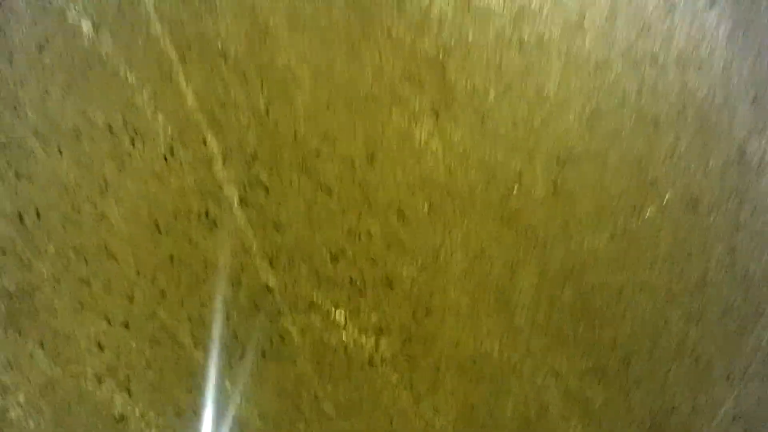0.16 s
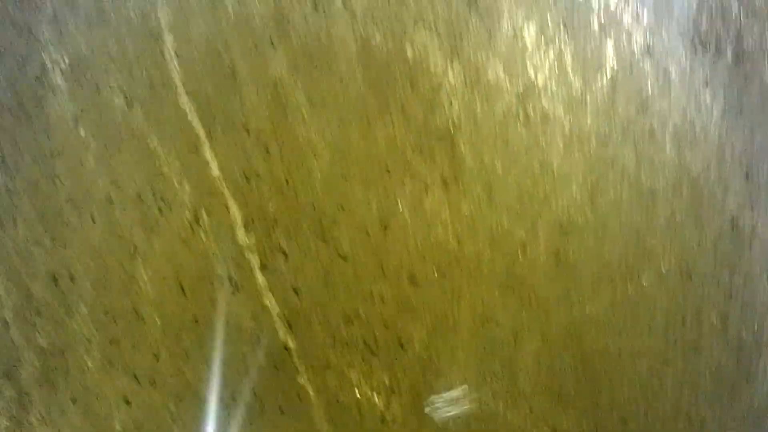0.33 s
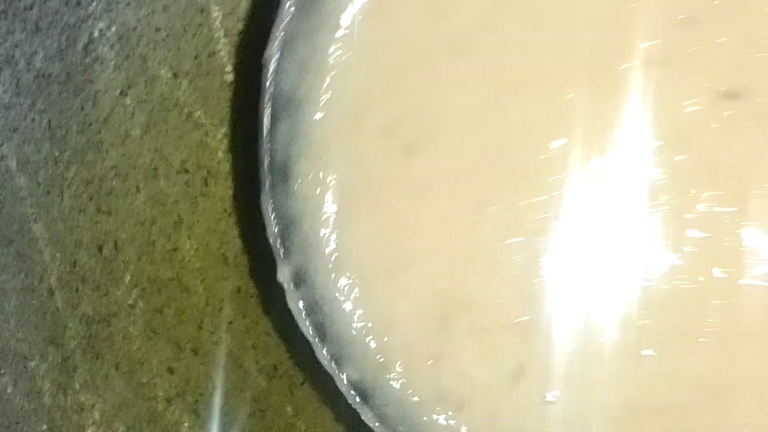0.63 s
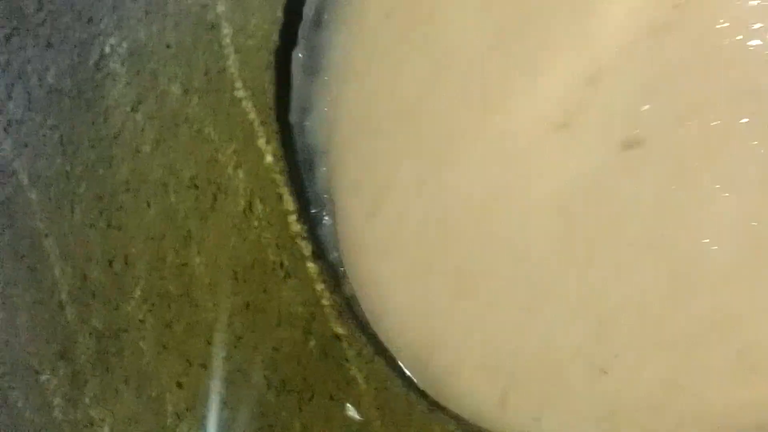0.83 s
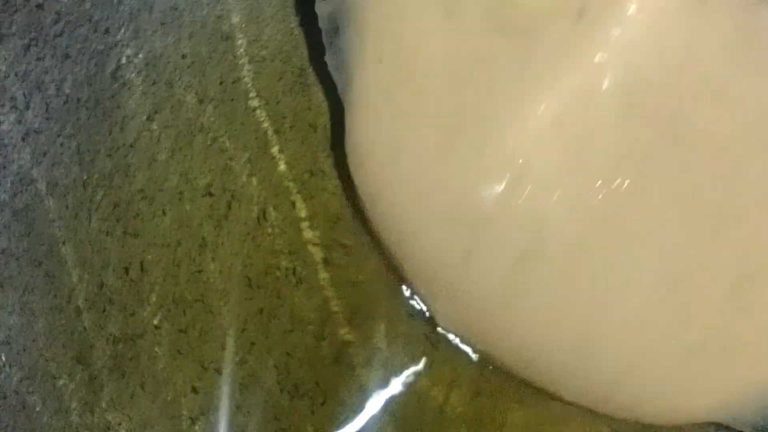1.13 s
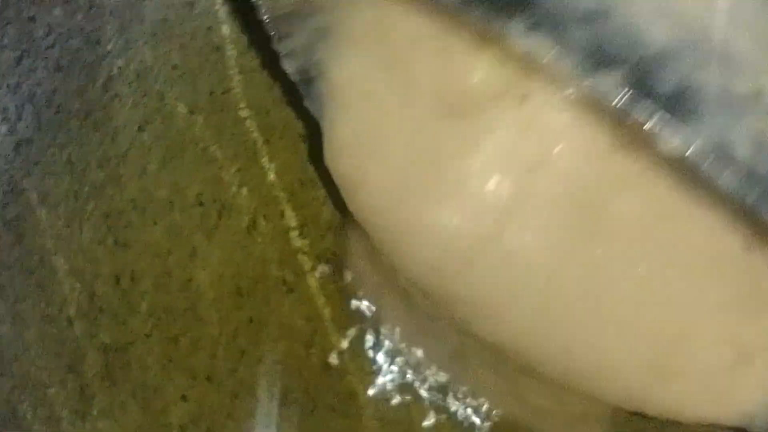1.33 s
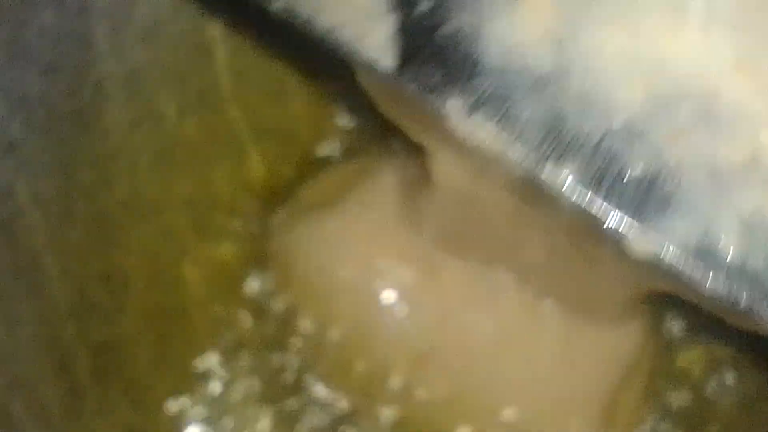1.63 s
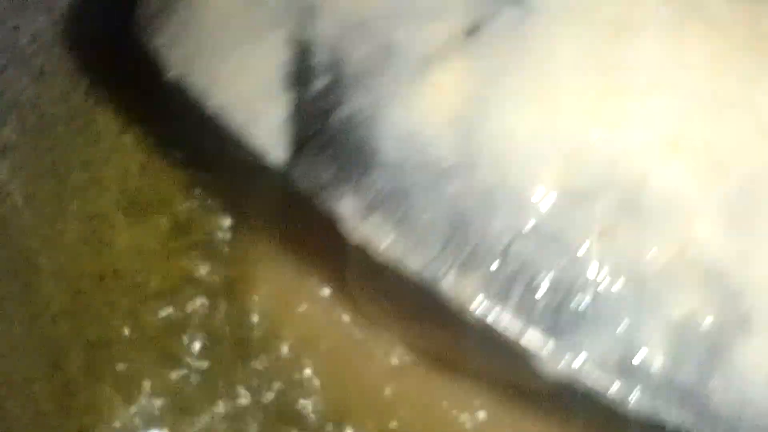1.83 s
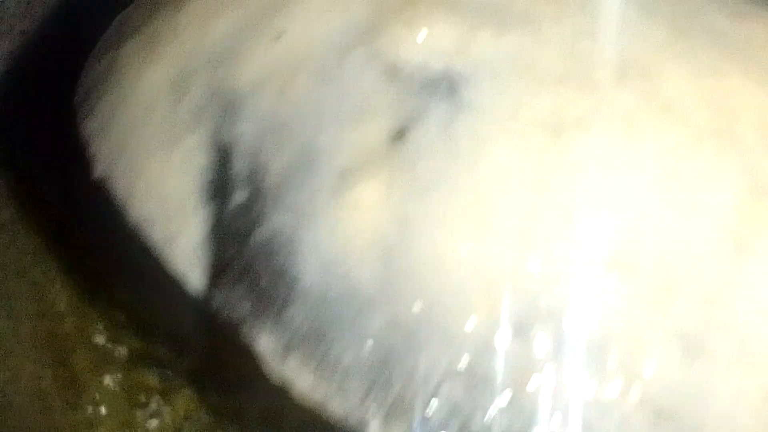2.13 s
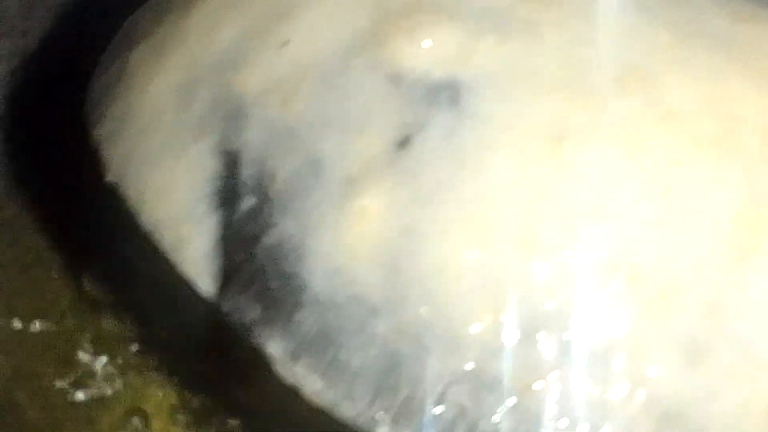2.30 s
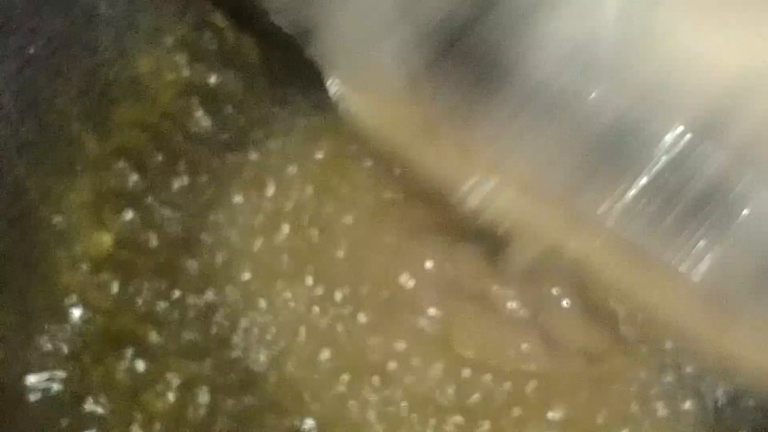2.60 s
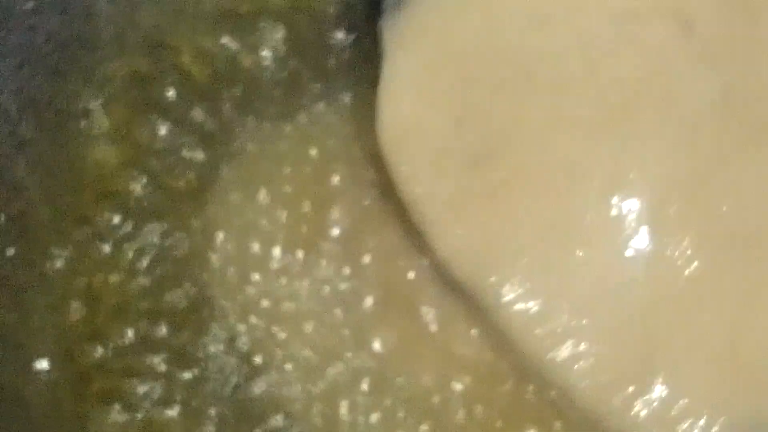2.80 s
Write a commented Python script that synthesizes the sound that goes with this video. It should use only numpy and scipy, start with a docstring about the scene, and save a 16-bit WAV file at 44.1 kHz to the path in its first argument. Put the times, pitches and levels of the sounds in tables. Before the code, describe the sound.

After a brief moment of faint low hum, hot oil sizzles sharply around batter, crackling and boiling, then the coarser bubbling fades, leaving thin hiss over steady muffled knocking; close mono pickup in a home kitchen.

```python
"""A low kitchen hum comes first, then batter meets hot oil: steam bubbles of many sizes burst by the thousand.
The bubbles are filtered noise bursts: a fine fizz, middle and coarse boils that start later and calm first,
and a thin spray. They ring the pan, modelled as narrow wavering resonances, and a hollow hiss that climbs.
Something nearby is knocked softly about three times a second: decaying cosines, a dull rumble and a room tail.
The hum is coloured noise, and the whole scene is mono."""
import sys
import numpy as np
from scipy import signal
from scipy.fft import rfft, irfft
from scipy.io import wavfile
from scipy.ndimage import uniform_filter1d

SR = 44100
rng = np.random.default_rng(int(sys.argv[2]) if len(sys.argv) > 2 else 0)


def gain_from_db(level_db):
    """Convert decibel levels to linear amplitude factors (20 dB per decade)."""
    decades = np.asarray(level_db, float) / 20
    return 10 ** decades


def transcribe(signal):
    """Save signal, clipped to [-1, 1], as a 16-bit WAV file at the path in sys.argv[1]."""
    frames = np.atleast_2d(signal).T
    limited = np.clip(frames, -1, 1)
    pcm = np.round(limited * 32767).astype(np.int16)
    wavfile.write(sys.argv[1], SR, pcm)


N = 130095  # length [samples]

# Hum level before its random waver (time [s], level [dB])
HUM_LEVEL = [(0, -65), (.12, -71), (.3, -71), (.55, -74), (1.1, -70), (1.3, -72), (1.6, -70), (1.9, -67),
             (2.4, -72), (2.95, -66.5)]
# Relative spectrum of the hum (frequency [Hz], density [dB per Hz])
HUM_COLOUR = [(20, 2), (36, -15), (60, -11), (100, -15), (128, -15), (149, -1), (172, -20), (230, -11.5),
              (320, -24.5), (970, -47), (1300, -27), (2000, -44), (15500, -71)]

# Level of each bubble family before the random surges (time [s], level [dB])
FIZZ_LEVEL = [(.074, -100), (.079, -68), (.088, -76), (.1, -76), (.11, -48), (.12, -41), (.16, -34),
              (.3, -36.5), (.64, -40), (.74, -38.5), (.8, -36), (.95, -35.5), (1.05, -38), (1.3, -39.5),
              (1.6, -40.5), (1.75, -39), (2.0, -41), (2.3, -41), (2.45, -43.5), (2.52, -40.5), (2.7, -42),
              (2.85, -42.5), (2.95, -43)]
BOIL_LEVEL = [(.1, -95), (.13, -72), (.16, -56), (.22, -46.5), (.3, -46.5), (.55, -44.5), (.7, -44.5),
              (.8, -41.5), (.95, -42), (1.1, -44.5), (1.35, -44.5), (1.6, -46), (1.75, -43), (2.0, -44.5),
              (2.15, -43), (2.33, -49.5), (2.4, -52.5), (2.5, -58), (2.53, -56), (2.6, -58.5), (2.75, -62),
              (2.82, -65.5), (2.95, -55)]
MIDDLE_LEVEL = [(.1, -97), (.108, -65), (.16, -49), (.6, -47.5), (.85, -45), (1.2, -44.5), (1.55, -44.5),
                (1.75, -41), (2.34, -47.5), (2.41, -54), (2.47, -60), (2.52, -52.5), (2.6, -59.5),
                (2.8, -65)]
SPRAY_LEVEL = [(.1, -102), (.108, -60), (.15, -55.5), (.3, -52), (.65, -55), (.75, -49.5), (.9, -48),
               (1.3, -51), (1.6, -49.5), (1.75, -48.5), (2.0, -51.5), (2.3, -51.5), (2.5, -53),
               (2.7, -53.5), (2.95, -53)]
# Relative spectral shaping of each family (frequency [Hz], density [dB per Hz])
FIZZ_COLOUR = [(1500, -45), (2700, -24), (3200, -21), (3300, -5), (5000, -4.5), (7300, 0.5), (7900, -3),
               (8300, -4.5), (8900, -7.5), (9500, -18), (12000, -42)]
BOIL_COLOUR = [(150, -47), (250, -30), (350, -23), (550, -9.5), (900, -2.5), (1400, 5.5), (1520, -7),
               (3000, -18), (6000, -55)]
MIDDLE_COLOUR = [(1200, -35), (1600, -2), (3100, 0.5), (4200, -24)]
SPRAY_COLOUR = [(7000, -37), (8800, 7.5), (10000, 8.5), (12500, 11), (15500, 16), (17000, -39)]
BURST_DECAY_S = 0.00093  # time constant of a burst's power

# Pan modes; levels are drives into narrow(), relative to the boil or the fizz
# (frequency [Hz], width of one filter stage [Hz], boil drive [dB],
#  first fizz drive [dB], second fizz drive [dB])
PAN_MODES = [(406, 40, -24.5, -74, -41), (770, 23, -17.5, -50, -33.5), (838, 34, -7, -50, -26.5),
             (977, 37, -11, -43, -35), (1052, 31, -15.5, -46, -40), (1122, 13, -28, -45, -51),
             (1318, 54, -9.5, -42, -13.5), (1416, 53, -15, -37, -35), (2025, 120, -19.5, -23, -35),
             (2173, 43, -15, -44, -42), (2570, 160, -22, -21.5, -22), (2993, 110, -18.5, -12.5, -22.5),
             (3400, 108, -15, -23.5, -17.5), (3990, 140, -14, -37, -14), (4795, 160, -15, -28, -20),
             (5260, 42, -34, -17, -18), (5470, 51, -20, -25, -20.5), (6100, 90, -33, -12, -17),
             (6540, 150, -27, -13.5, -16), (6970, 99, -33, -9, -22.5), (7186, 84, -28, -15, -12.5),
             (7760, 250, -24, -9, -15.5), (8030, 160, -40, -29, -12.5)]
# Balance of the pan's ringing between two tone colours (time [s], mix from first to second [0-1])
PAN_BALANCE = [(.1, 0.15), (.5, 0.58), (1.5, 0.97), (2.3, 0.81), (2.48, 0.86), (2.53, 0.92), (2.95, 0.94)]
DETUNE_SHARE, DETUNE_RATE_HZ = 0.006, 70  # the shifting oil detunes each mode
# Hollow resonance, drive relative to the fizz (time [s], centre [Hz], drive [dB])
HOLLOW = [(0.12, 4190, -18), (0.349, 4324, -9), (0.599, 4394, -10), (0.997, 4474, -14), (2.0, 4384, -13),
          (2.95, 4440, -18)]
HOLLOW_WIDTH_HZ = 148  # of one filter stage

# Soft knocks (time [s], blow level [dB], ring re blow [dB], thud re blow [dB])
KNOCKS = [(.14, -46, -17, -15), (0.435, -44, -15, -17), (0.728, -39.5, -23, -17), (1.025, -40.5, -29, -17),
          (1.378, -39.5, -18.5, -12), (1.682, -46.5, -12.5, 0), (1.979, -41, -16.5, -3),
          (2.264, -46, -17, -20), (2.552, -48.5, -9.5, 2), (2.849, -46, -9.5, 0)]
# Modes of the knocked thing, short blow and longer ring; levels before decay
# (frequency [Hz], level [dB], 60 dB decay time [s])
BLOW_MODES = [(306, -1, 0.059), (401, -5, 0.097)]
RING_MODES = [(146.5, 6.5, 0.3), (119, -9, 0.1)]
PUSH_S = 0.0055
# Relative spectrum of the thud (frequency [Hz], density [dB per Hz])
RUMBLE_COLOUR = [(25, -5.5), (45, -14), (62, 1), (85, -13), (110, -28), (500, -49)]
RUMBLE_T60_S, RUMBLE_RISE_S = 0.32, 0.11
ROOM_HZ, ROOM_WIDTH_HZ, ROOM_DB, ROOM_T60_S = 274, 187, -20, 0.86  # width is of one filter stage


def table(rows, x, log=False):
    """Straight lines through the first two columns, on a linear or log x axis."""
    a, b = np.array(rows, float).T[:2]
    if log:
        return np.interp(np.log(x + 1), np.log(a + 1), b)
    return np.interp(x, a, b)


def unit(x):
    """Scale to rms 1."""
    return x / np.sqrt(np.mean(x ** 2))


def colour(x, rows, size=16384):
    """Causal minimum-phase filter with the given spectrum."""
    hz = np.arange(size // 2 + 1) * SR / size
    cepstrum = irfft(np.log(gain_from_db(table(rows, hz, log=True))))
    # fold the cepstrum forward in time
    cepstrum[1:size // 2] *= 2
    cepstrum[size // 2 + 1:] = 0
    impulse = irfft(np.exp(rfft(cepstrum)))
    return signal.fftconvolve(x, impulse)[:N]


def resonance(x, hz, width_hz):
    """Two-pole band-pass, gain 1 at the centre."""
    b, a = signal.iirpeak(min(hz, SR / 2.2), hz / width_hz, SR)
    return signal.lfilter(b, a, x)


def walk(rate):
    """Random levels held 1 / rate s and smoothed twice; spread near 1."""
    k = int(SR / rate)
    steps = np.repeat(rng.standard_normal(N // k + 1), k)
    return 1.3 * uniform_filter1d(uniform_filter1d(steps, k), k)[:N]


def hum():
    """Low kitchen hum: coloured noise whose level wavers."""
    level_db = table(HUM_LEVEL, np.arange(N) / SR) + 0.52 * walk(5.5)
    return gain_from_db(level_db) * unit(colour(rng.standard_normal(N), HUM_COLOUR))


def pops(spread):
    """Bursts too dense to count, rare ones much bigger; each starts sharply and dies away."""
    kicks = gain_from_db(2 * spread * rng.exponential(size=N))
    power = signal.lfilter([1], [1, -np.exp(-1 / (BURST_DECAY_S * SR))], kicks)
    return unit(rng.standard_normal(N) * np.sqrt(power))


def bubbles(level, rows, surge_db, spread, flicker_db):
    """Each bubble size rings at its own pitch and flickers alone; returns the sound and its gain."""
    gain = gain_from_db(table(level, np.arange(N) / SR) + surge_db)
    bursts = 0
    for hz in np.geomspace(rows[0][0], rows[-1][0], num=8):
        flickering = pops(spread) * gain_from_db(flicker_db * walk(14.45))
        bursts = bursts + resonance(flickering, hz, hz / 2) / np.sqrt(hz)
    return gain * unit(colour(bursts, rows)), gain


def narrow(push, hz, width_hz, spread):
    """Bursts through a steep two-stage resonance whose centre may move; rms about 3 dB above push."""
    pole = np.exp(-np.pi * width_hz / SR)
    bursts = push * (pops(spread) + 1j * pops(spread))
    # smooth around 0 Hz, then shift up to the moving centre
    slow = signal.lfilter([1], [1, -2 * pole, pole ** 2], bursts)
    carrier = np.exp(2j * np.pi * np.cumsum(hz) / SR)
    return np.real(slow * carrier) * 2 * np.sqrt(2) * (1 - pole) ** (3 / 2)


def pan(boil_gain, fizz_gain):
    """Bursts ring wavering modes; their balance drifts from one tone colour towards another and partly back."""
    balance = np.clip(table(PAN_BALANCE, np.arange(N) / SR), 0, 1)
    out = 0
    for hz, width_hz, boil_db, first_db, second_db in PAN_MODES:
        fizz_db = first_db + balance * (second_db - first_db)
        push = np.hypot(gain_from_db(boil_db) * boil_gain, gain_from_db(fizz_db) * fizz_gain)
        push = push * gain_from_db(1.2 * walk(60))
        centre_hz = hz * (1 + DETUNE_SHARE * walk(DETUNE_RATE_HZ))
        out = out + narrow(push, centre_hz, width_hz, 1.5)
    return out


def hollow(fizz_gain):
    """A band of hiss whose centre climbs, then settles a little, while its level swells and fades."""
    t, rows = np.arange(N) / SR, np.array(HOLLOW)
    push = fizz_gain * gain_from_db(table(rows[:, [0, 2]], t))
    return narrow(push, table(rows, t), HOLLOW_WIDTH_HZ, 1.9)


def sizzle():
    """Four families of bubbles surge together, each by its own depth, and ring the pan."""
    surge = walk(8.4) + 1.54 * walk(60.33)
    fizz, fizz_gain = bubbles(FIZZ_LEVEL, FIZZ_COLOUR, 0.33 * surge, spread=2.88, flicker_db=-1.1)
    boil, boil_gain = bubbles(BOIL_LEVEL, BOIL_COLOUR, 0.82 * surge, spread=1.93, flicker_db=1.85)
    spray, _ = bubbles(SPRAY_LEVEL, SPRAY_COLOUR, 0.27 * surge, spread=2.8, flicker_db=-2.0)
    middle, _ = bubbles(MIDDLE_LEVEL, MIDDLE_COLOUR, 0.53 * surge, spread=1.27, flicker_db=-0.8)
    return fizz + boil + middle + spray + pan(boil_gain, fizz_gain) + hollow(fizz_gain)


def fall(t, t60):
    """Exponential decay by 60 dB in t60 seconds."""
    return np.exp(-np.log(1000) * t / t60)


def rung(modes, t):
    """A soft push sets off decaying modes whose cosines line up as it ends."""
    push = np.sin(np.pi / 2 * np.minimum(t / PUSH_S, 1)) ** 2
    return push * sum(gain_from_db(db) * np.cos(2 * np.pi * hz * (t - PUSH_S)) * fall(t, t60)
                      for hz, db, t60 in modes)


def knocks():
    """Each soft push rings the same modes; a dull rumble and the room's tail follow, all within 0.5 s."""
    t = np.arange(SR // 2) / SR
    blow, ring = rung(BLOW_MODES, t), rung(RING_MODES, t)
    thud_shape = (1 - np.exp(-t / RUMBLE_RISE_S)) * fall(t, RUMBLE_T60_S)
    tail_shape = (1 - np.exp(-t / PUSH_S)) * fall(t, ROOM_T60_S)
    struck, thud, tail = np.zeros((3, N + len(t)))
    for s, db, ring_db, thud_db in KNOCKS:
        start = int(s * SR)
        span = slice(start, start + len(t))
        struck[span] += gain_from_db(db) * (blow + gain_from_db(ring_db) * ring)
        thud[span] += gain_from_db(db + thud_db) * thud_shape
        tail[span] += gain_from_db(db + ROOM_DB) * tail_shape
    room = resonance(rng.standard_normal(N), ROOM_HZ, ROOM_WIDTH_HZ)
    room = unit(resonance(room, ROOM_HZ, ROOM_WIDTH_HZ))
    rumble = unit(colour(rng.standard_normal(N), RUMBLE_COLOUR))
    return struck[:N] + tail[:N] * room + thud[:N] * rumble


def scene():
    """One microphone feeds both channels."""
    mono = hum() + sizzle() + knocks()
    return np.tile(mono, (2, 1))


def low_pass(x):
    """Removes everything above the highest recorded frequency."""
    return signal.sosfilt(signal.butter(12, 17010, fs=SR, output="sos"), x)


def record(dry):
    """Deliver the finished mix."""
    return low_pass(dry)


dry = scene()
out = record(dry)
transcribe(out)
```